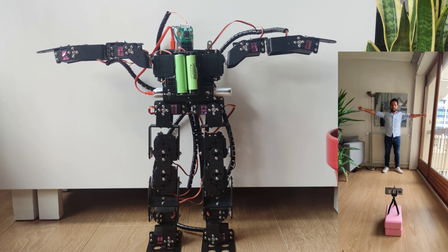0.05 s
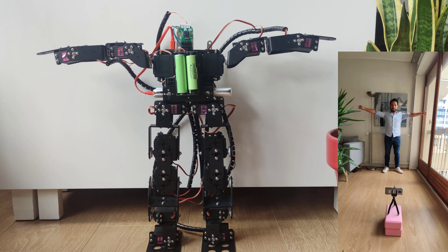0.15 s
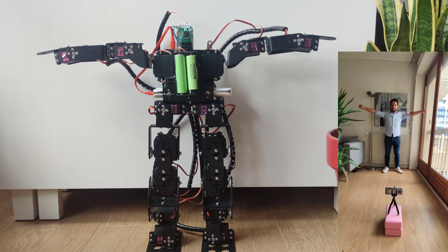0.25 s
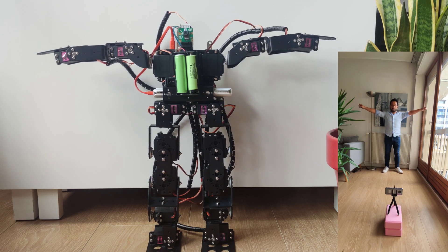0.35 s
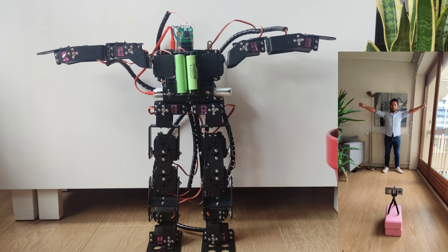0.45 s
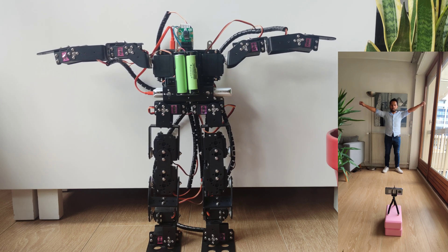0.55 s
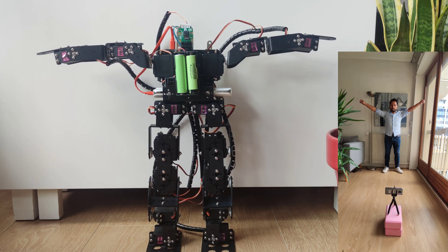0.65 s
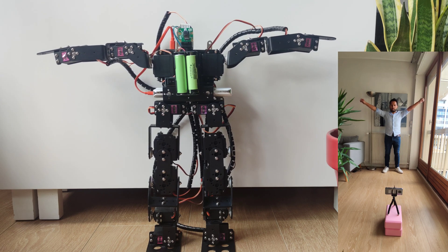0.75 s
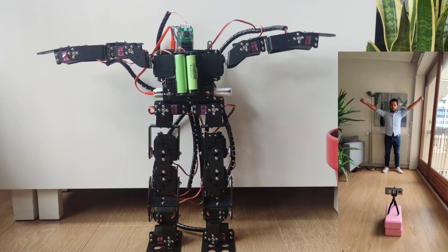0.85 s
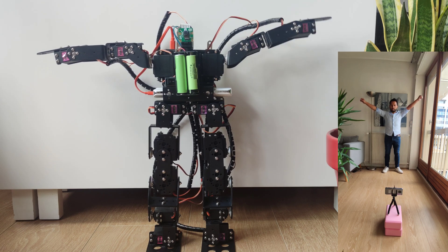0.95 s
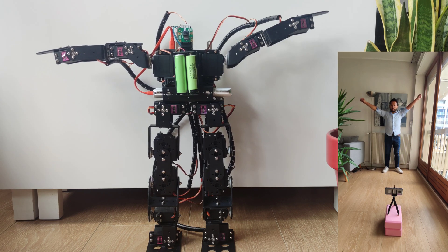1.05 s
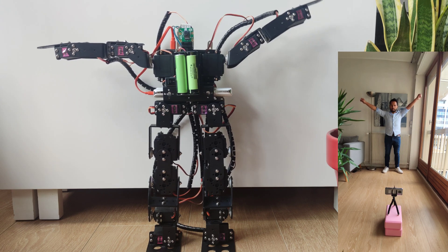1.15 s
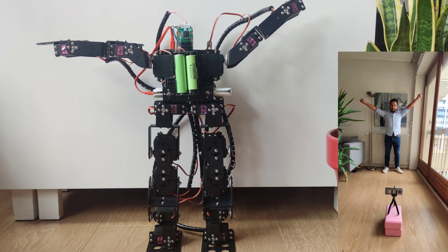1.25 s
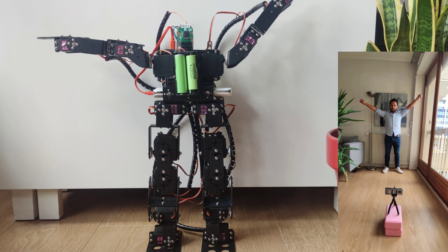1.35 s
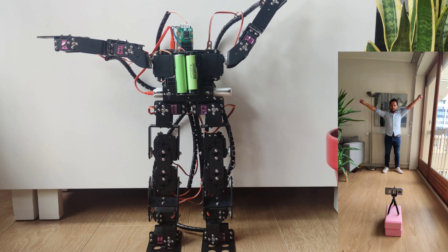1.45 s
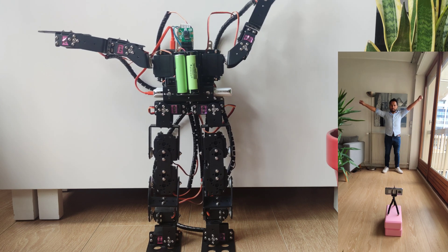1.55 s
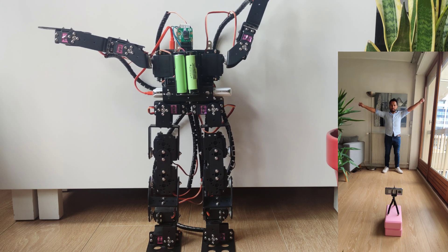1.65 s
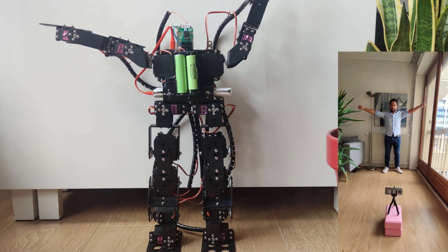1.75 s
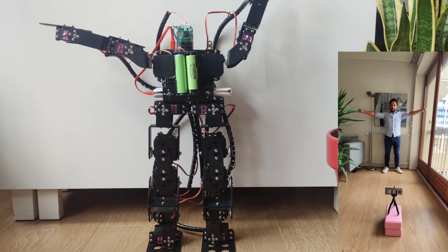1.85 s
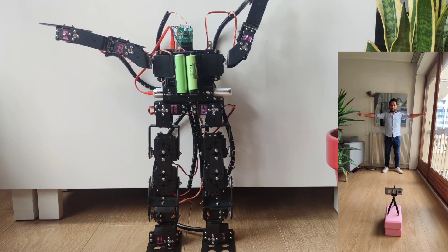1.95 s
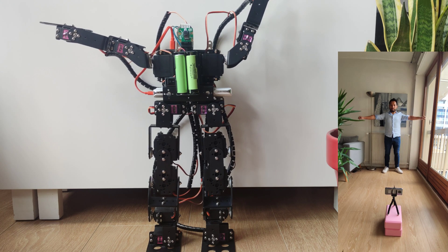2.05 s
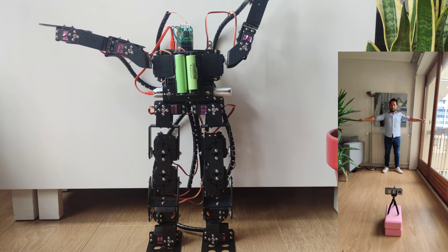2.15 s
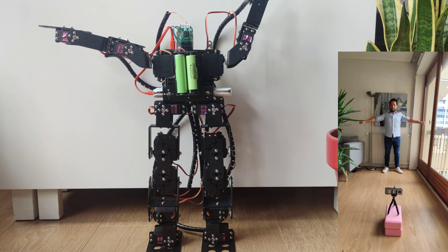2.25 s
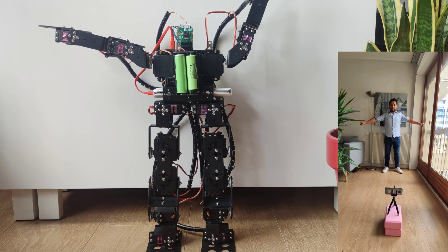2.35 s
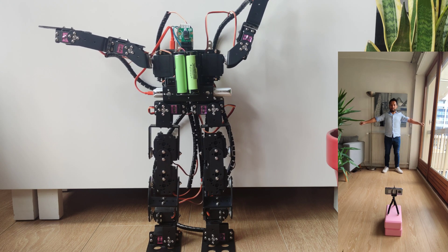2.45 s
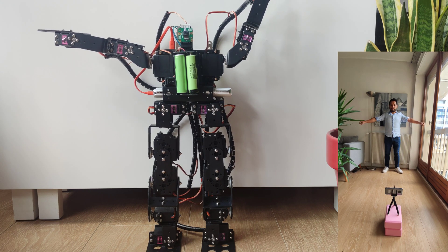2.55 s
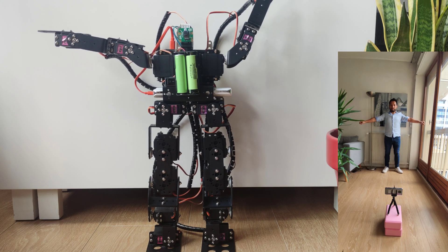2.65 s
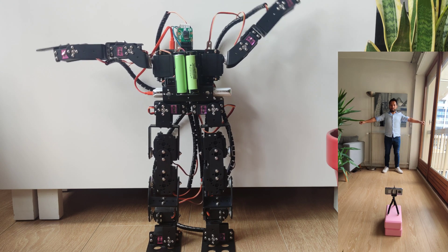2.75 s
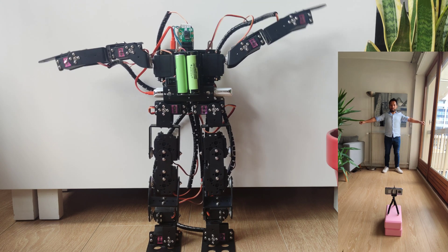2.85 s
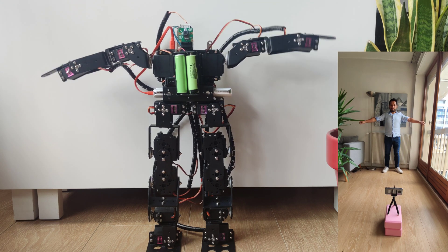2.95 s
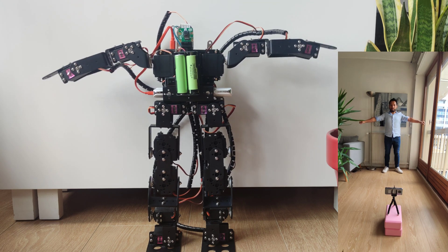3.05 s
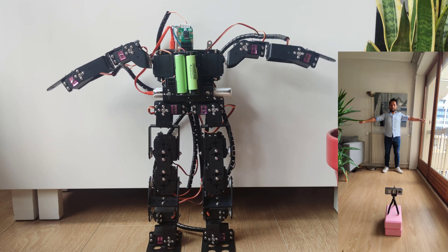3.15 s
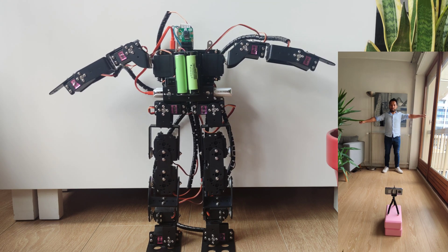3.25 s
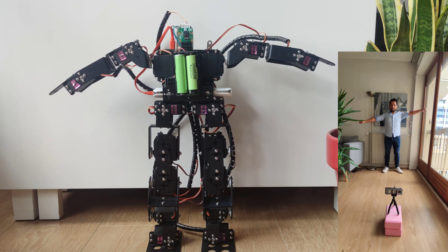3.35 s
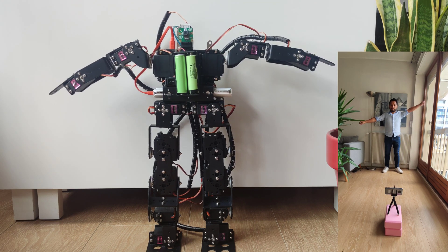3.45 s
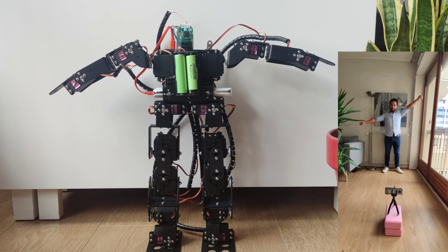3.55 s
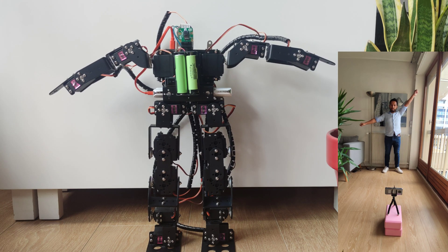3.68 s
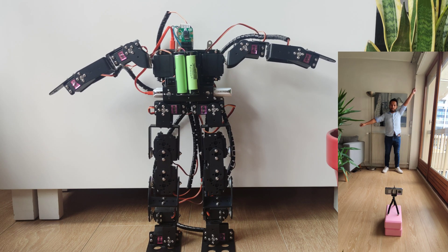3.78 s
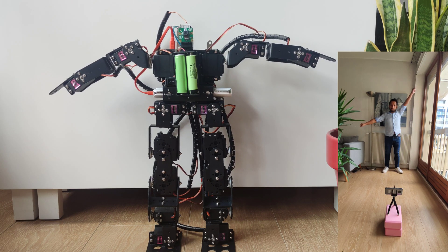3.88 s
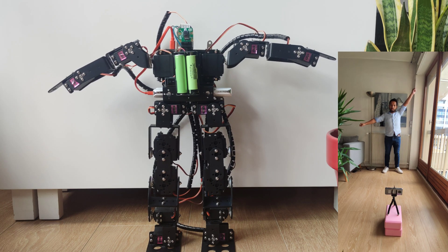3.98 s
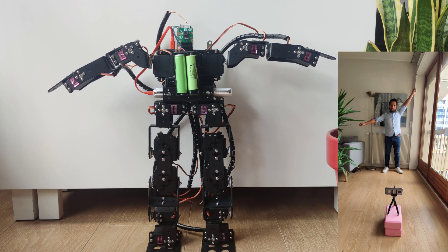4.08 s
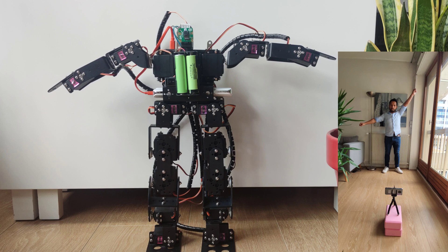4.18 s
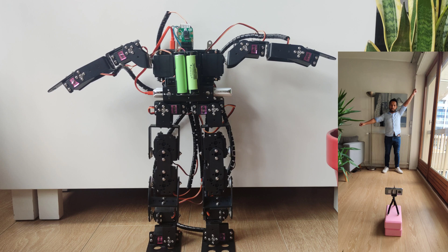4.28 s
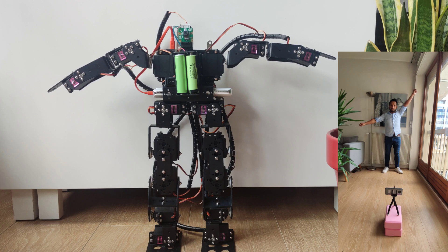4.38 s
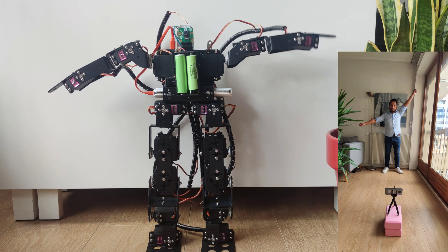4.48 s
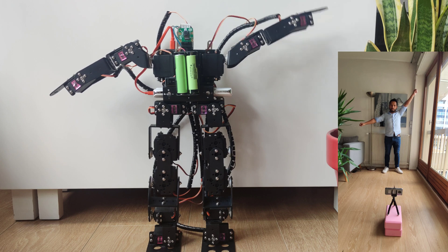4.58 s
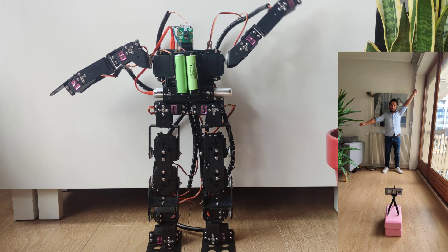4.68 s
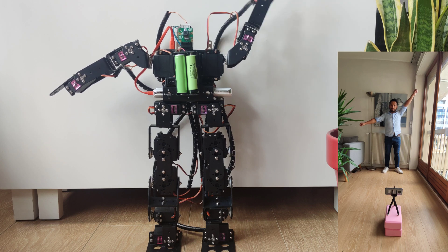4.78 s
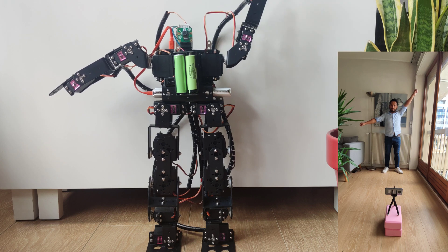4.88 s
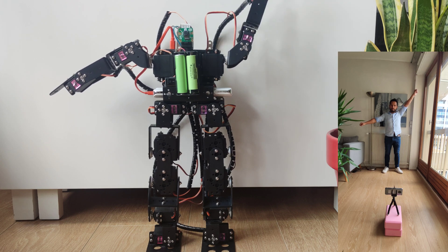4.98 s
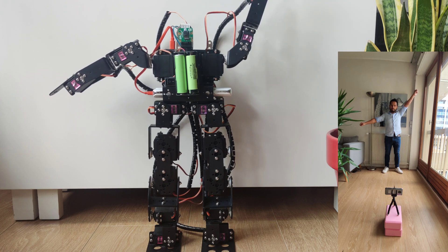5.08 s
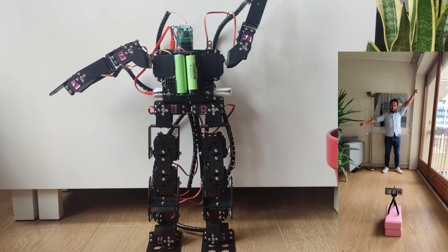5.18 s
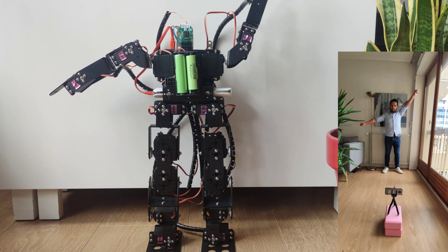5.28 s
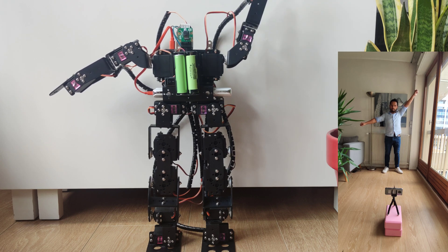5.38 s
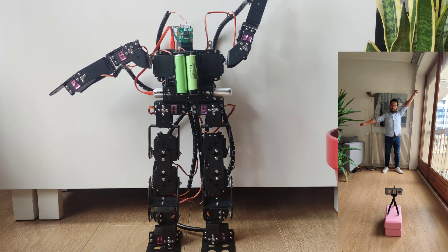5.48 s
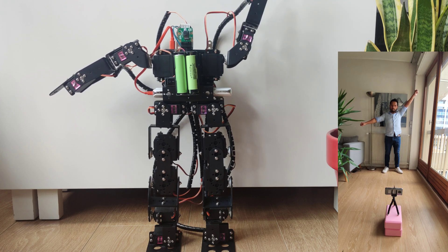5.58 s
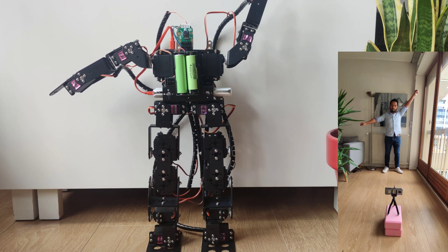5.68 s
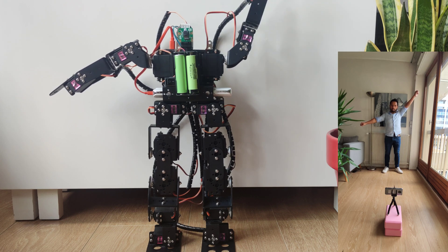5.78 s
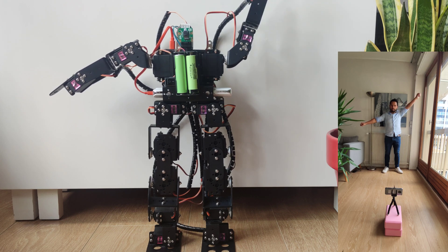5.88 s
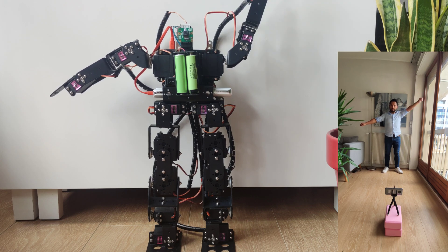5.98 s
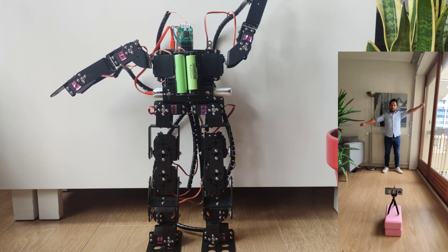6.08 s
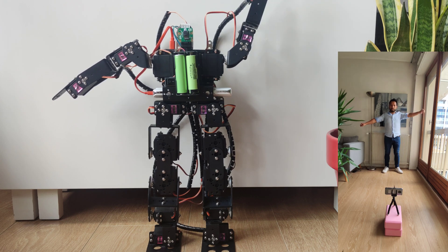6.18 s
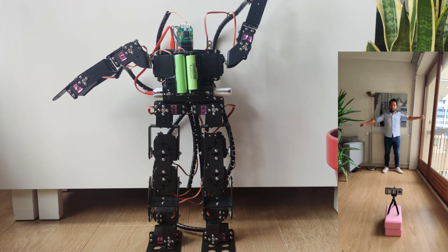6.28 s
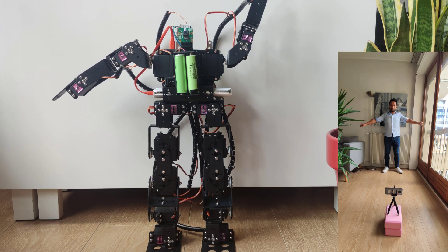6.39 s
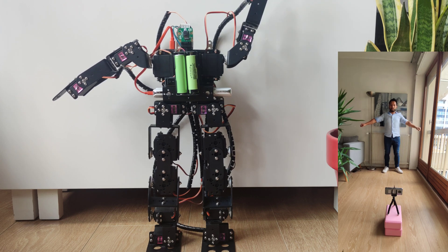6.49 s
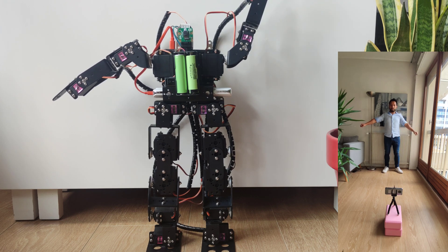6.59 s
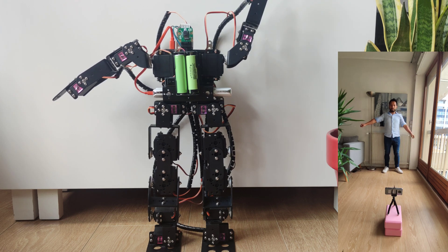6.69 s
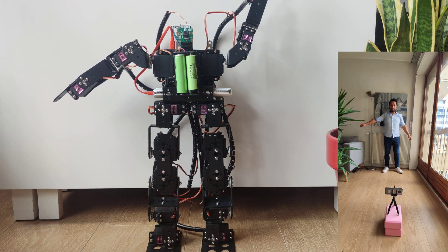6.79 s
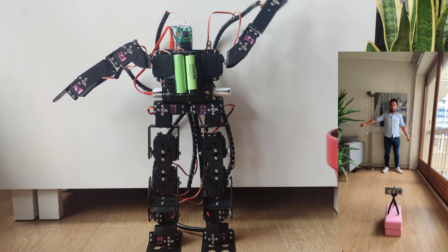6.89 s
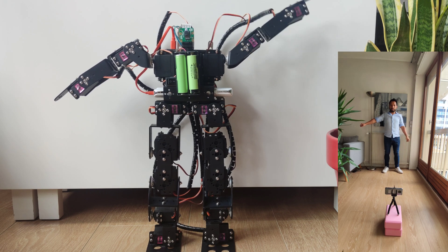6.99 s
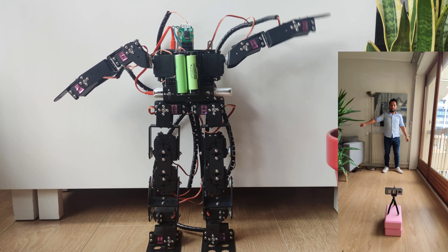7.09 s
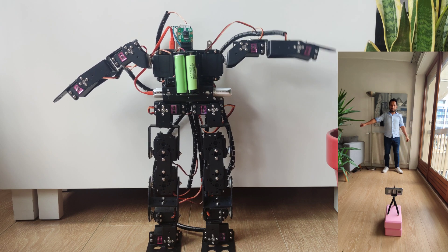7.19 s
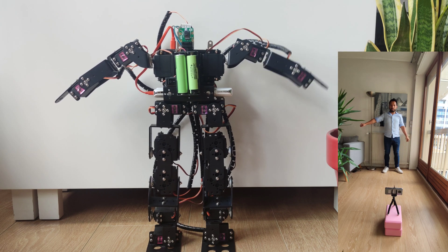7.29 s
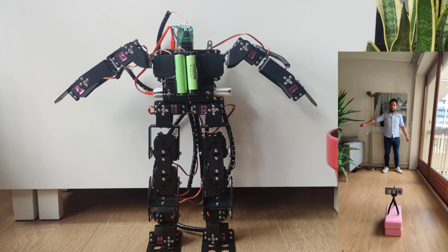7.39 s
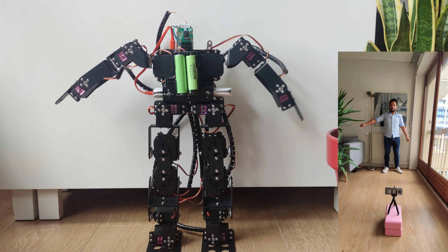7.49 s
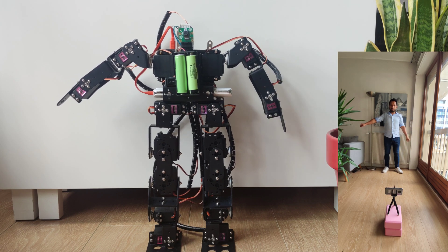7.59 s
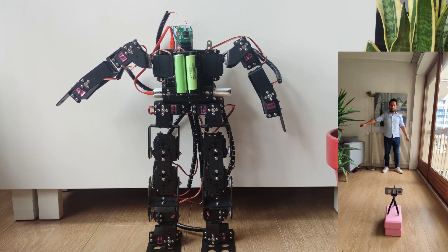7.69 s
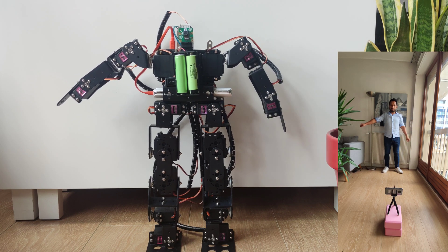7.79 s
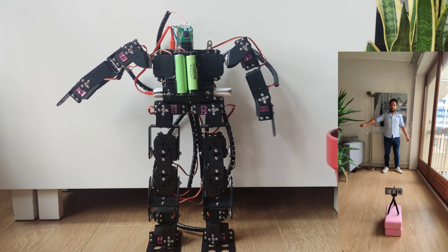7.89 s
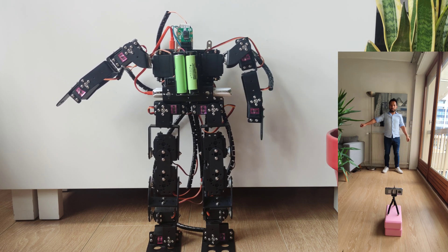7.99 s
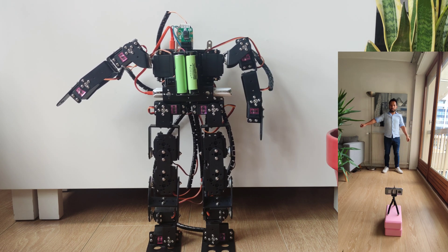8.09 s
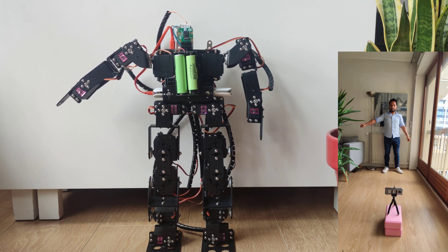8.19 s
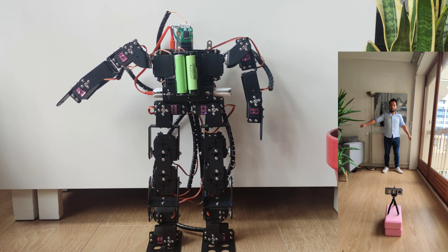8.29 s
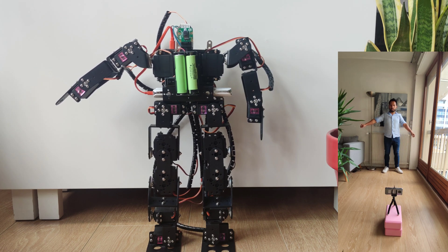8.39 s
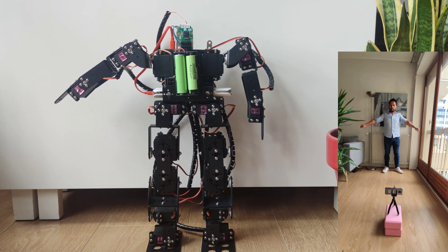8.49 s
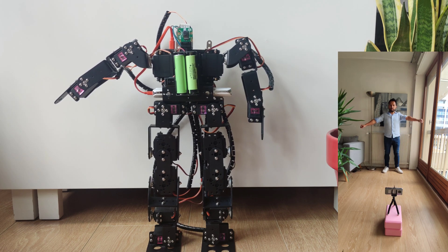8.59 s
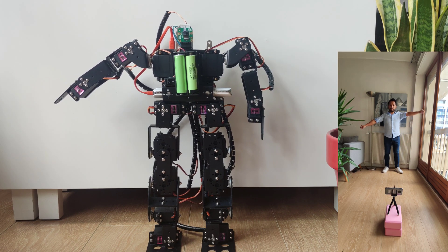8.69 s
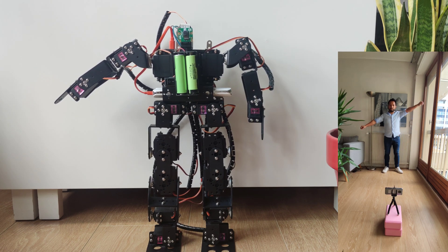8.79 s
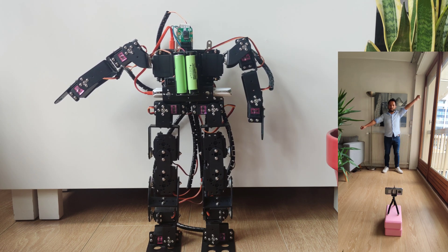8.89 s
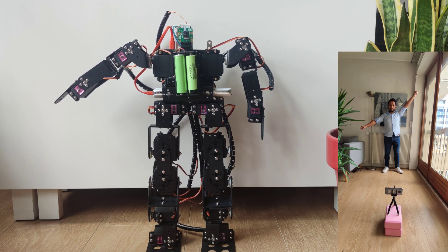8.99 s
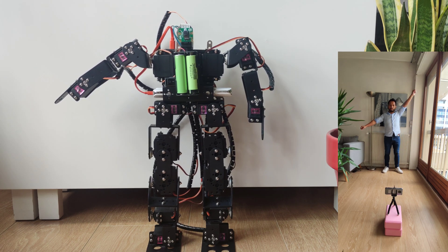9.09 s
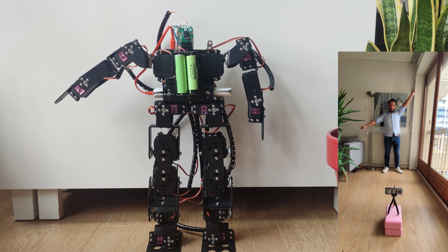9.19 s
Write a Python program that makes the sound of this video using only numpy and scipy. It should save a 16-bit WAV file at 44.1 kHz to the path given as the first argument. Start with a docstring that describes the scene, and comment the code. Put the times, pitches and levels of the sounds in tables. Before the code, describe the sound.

Close to the microphone, the little servo motors in a robot's arms run in four main bursts of high, gritty whirring, mixed with short chirps. The third burst sings with a whine that glides upward, and the fourth is broken by two faint, dull bumps before a final short whir. A thin electronic buzz, tiny gear twitches and soft indoor rumble fill the pauses.

```python
"""Close, rattling whirs of a small robot raising and lowering its arms in a quiet living room.
Servo gear teeth strike and slide in their cases; motor brushes hiss. Short pushes chirp, and on one
fast lift the teeth mesh evenly and sing a gliding whine. Joints knock twice, taking up slack.
Between moves the servos twitch, buzz under load and hum with their control pulses, over a low rumble."""
import sys
import numpy as np
from scipy import signal
from scipy.fft import rfft, irfft
from scipy.io import wavfile
from scipy.ndimage import map_coordinates

SR = 44100
rng = np.random.default_rng(int(sys.argv[2]) if len(sys.argv) > 2 else 0)


def int16_out(signal):
    """Quantize to a 16-bit WAV file."""
    q = np.round(np.clip(np.atleast_2d(signal).T, -1, 1) * 32767)
    wavfile.write(sys.argv[1], SR, q.astype(np.int16))


N = 407484
TIME = np.arange(N) / SR
FREQ = np.maximum(np.arange(N // 2 + 1) * SR / N, 1)
SIDE = np.array([[1], [-1]])  # left +, right -


def undb(db):
    """Decibels to gain."""
    return 10 ** (np.asarray(db) / 20)


def unit(x):
    """Scale to rms 1."""
    return x / np.sqrt(np.mean(x ** 2))


def noise():
    """White noise."""
    return rng.standard_normal(N)


def walk(rate_hz):
    """Smooth random control, spread near 1."""
    return 1.2 * np.interp(TIME * rate_hz, np.arange(N // 8), rng.standard_normal(N // 8))


def curve(points):
    """Control through (t/s, value) points."""
    return np.interp(TIME, *np.transpose(points))


def shape(points, grid_hz=FREQ):
    """Gain against frequency through (f/Hz, level/dB) points."""
    hz, db = np.transpose(points)
    return undb(np.interp(np.log(grid_hz), np.log(hz), db))


def colour(x, points):
    """Minimum-phase filter through (f/Hz, level/dB) points."""
    size = 2048
    grid_hz = np.maximum(np.arange(size // 2 + 1) * SR / size, 1)
    cepstrum = irfft(np.log(shape(points, grid_hz)))
    cepstrum[1:size // 2] *= 2
    cepstrum[size // 2 + 1:] = 0
    return signal.oaconvolve(x, irfft(np.exp(rfft(cepstrum))))[:N]


def ring(x, modes):
    """Parallel resonances (f/Hz, width/Hz, level/dB)."""
    return sum(undb(db) * signal.lfilter(*signal.iirpeak(hz, hz / width, SR), x)
               for hz, width, db in modes)


def pulses(hz):
    """One click a cycle, split between two samples."""
    cycles = np.cumsum(hz / SR)
    hit = np.diff(np.floor(cycles), prepend=0)
    late = cycles % 1 * SR / hz
    return hit * late + np.roll(hit * (1 - late), 1)


def drive(start_s, length_s, rise_s, fall_s):
    """Rises towards 1 while powered, then decays."""
    since_s = np.maximum(TIME - start_s, 0)
    return (1 - np.exp(-since_s / rise_s)) * np.exp(-np.maximum(since_s - length_s, 0) / fall_s)


def place(x, pan_db):
    """Pan by left minus right level."""
    return x * undb(SIDE * pan_db / 2)


def air(bed_db=-59, drone_db=-70.5):
    """Still room: low rumble, faint hiss, soft drones."""
    # mid spectrum: f/Hz, level/dB
    mid_colour = [(12, -18), (22, -2.5), (36, 0), (60, -4.5), (85, -7.5), (110, -5), (160, -11), (300, -14),
                  (480, -19.5), (750, -24.5), (1400, -27), (3900, -33), (7200, -33.5), (15800, -32.5)]
    # stereo width: f/Hz, side minus mid/dB
    side_colour = [(30, -1.5), (70, -10.5), (250, -4.5), (600, -0.5), (1500, 1.5), (6000, -0.5),
                   (9000, -15), (15000, -90)]
    # room drones: f/Hz, width/Hz, level/dB
    drones = [(230.3, 13.4, 0), (298, 19, -4.5), (438, 64, -8.5)]
    mid = irfft(rfft(noise()) * shape(mid_colour), N)
    side = irfft(rfft(noise()) * shape(mid_colour) * shape(side_colour), N)
    bed = (mid + SIDE * side) * undb(bed_db) / mid.std()
    return place(bed, pan_db=-0.5) + undb(drone_db) * unit(ring(noise(), drones))


def hum(frame_hz=49.27):
    """Control frames repeat steadily; their harmonics sound where the motors resonate."""
    # motor resonances: f/Hz, width/Hz, level/dB
    modes = [(1930, 56, -80.3), (2938, 134, -78.3)]
    # drift of the lower resonance: t/s, gain/dB
    lower_drift = [(0, -0.5), (2, 2), (4, 2.5), (5.5, 0), (8.3, -1), (9.24, -4)]
    phase = 2 * np.pi * np.cumsum(frame_hz * (1 + 0.00043 * walk(3))) / SR
    out = 0
    for (hz, width_hz, db), drift_db in zip(modes, [curve(lower_drift), 0]):
        orders = round(hz / frame_hz) + np.arange(-3, 4)
        weights = 1 / (1 + (2 * (orders * frame_hz - hz) / width_hz) ** 2)
        tone = sum(w * np.cos(k * phase + rng.uniform(0, 2 * np.pi)) for k, w in zip(orders, weights))
        out += undb(db + drift_db + 1.5 * walk(25)) * unit(tone)
    return out


def holding(hunt_hz=128, wander=0.03):
    """A servo bearing the arm's weight hunts around its position and buzzes thinly."""
    # case resonances: f/Hz, width/Hz, level/dB
    modes = [(5220, 62, -12), (7050, 120, 2), (7543, 37, 12.5), (8430, 210, -1), (10100, 65, -5)]
    # spells under load: start/s, length/s, level/dB
    holds = [(-0.5, 2.92, -73), (3, 1.1, -70), (5, 4.15, -72)]
    kick_hz = hunt_hz * (1 + wander * np.tanh(walk(2.5)))
    kicks = unit(pulses(kick_hz) * undb(5.1 * np.tanh(walk(60)))) + noise()
    buzz = colour(ring(kicks, modes), [(2000, -41), (4700, 16.5), (10000, -7.5), (13000, -18)])
    effort = sum(undb(db) * drive(start_s, length_s, rise_s=0.096, fall_s=0.21)
                 for start_s, length_s, db in holds)
    return effort * unit(buzz)


def twitches():
    """The motor nudges the gears by a few teeth."""
    # nudges: t/s, level/dB, half length/s
    nudges = [(0.194, -68.5, 0.051), (2.242, -65.5, 0.051), (2.589, -61, 0.062), (2.71, -58.5, 0.017),
              (3.8, -70, 0.055), (4.05, -69.5, 0.053), (4.503, -52, 0.019), (6.237, -65.5, 0.059),
              (8.52, -64.5, 0.047)]
    # twitch spectrum: f/Hz, level/dB
    twitch_colour = [(2500, -17), (4000, -9.5), (6000, -6.5), (7500, -2.5), (9000, -6.5), (10500, 1),
                     (11800, -16), (15500, -20)]
    swell = sum(undb(db) * np.exp(-((TIME - at_s) / half_s) ** 2) for at_s, db, half_s in nudges)
    grit = noise() * undb(2.4 * walk(370))
    return swell * unit(colour(grit, twitch_colour))


def motor(load, spin_up_s=0.045, coast_s=0.08):
    """Each push spins a motor up, then it coasts; gives speed (0-1), gear gain and brush gain."""
    # power pushes: start/s, length/s, gear level/dB, brush level/dB, load
    pushes = [(0.88, .08, -44.5, -58, "slow lift"), (0.946, .05, -36, -51, "slow lift"),
              (1.09, 0.16, -48.5, -59, "slow lift"), (1.262, .17, -46.5, -59, "slow lift"),
              (1.499, .148, -48, -58, "slow lift"), (2.701, 0.16, -38, -47.5, "drop"),
              (2.841, 0.058, -32, -41, "drop"), (2.913, 0.11, -34.5, -44, "drop"),
              (3.094, .125, -42, -59, "drop"), (4.451, .09, -39, -53, "fast lift"),
              (4.496, 0.38, -39.5, -50.5, "fast lift"), (6.882, 0.17, -43, -46, "drop"),
              (7.046, .03, -34, -49, "drop"), (7.088, 0.37, -39.5, -44.5, "drop"),
              (7.493, .06, -43, -62, "drop"), (7.542, 0.072, -33, -44, "drop"),
              (7.621, .07, -46, -59, "drop"), (7.915, .06, -47, -57, "settle"),
              (7.961, .074, -42.5, -53, "settle")]
    speed, gear_power, brush_power = np.zeros((3, N))
    for start_s, length_s, gear_db, brush_db, kind in pushes:
        if kind == load:
            spin = drive(start_s, length_s, spin_up_s, coast_s)
            speed = np.maximum(speed, spin)
            gear_power += (undb(gear_db) * spin ** 2) ** 2
            brush_power += (undb(brush_db) * spin ** 2) ** 2
    return speed, np.sqrt(gear_power), np.sqrt(brush_power)


def roam(x, patchy_db=4, apart_db=2, span_hz=420, change_s=0.022):
    """Turning wheels feed ever different resonances, each aimed its own way; mono to stereo."""
    hz, t, bands = signal.stft(x, SR, nperseg=256)
    grid = np.meshgrid(hz / span_hz, t / change_s, indexing="ij")
    both, apart = (map_coordinates(field, grid, order=1, mode="wrap")
                   for field in rng.standard_normal((2, 128, 1024)))
    gain = undb(apart_db * np.array([apart, -apart]) + patchy_db * np.clip(both, -2, 2))
    return signal.istft(bands * unit(gain), SR, nperseg=256)[1][:, :N]


def gears(load, case, tooth_hz, growl_db, ring_db, scatter_db, lurch_db, pan_db, elbow_db=-12):
    """Teeth strike unevenly and slide; a faster motor rattles louder and denser."""
    # treble loss of the cases: f/Hz, gain/dB
    case_top = [(11800, 0), (13000, -10)]
    # case resonances: f/Hz, width/Hz, level/dB
    case_modes = [(5390, 110, -6), (7335, 90, 0), (7790, 70, 1), (8700, 130, -1), (9800, 120, -2),
                  (10470, 110, 0)]
    # low ring of the arm brackets: f/Hz, level/dB
    bracket = [(400, -33.5), (900, -17), (1400, -6), (1950, 1), (2700, 6.5), (3150, 12), (4000, -8),
               (5000, -28.5)]
    # motor brush hiss: f/Hz, level/dB
    brush_colour = [(9000, -30), (11500, -11), (12400, -7), (13400, -5), (14500, -1), (15800, -10.5)]
    speed, gear_gain, brush_gain = motor(load)
    chatter_hz = tooth_hz * np.maximum(speed, 0.35)  # loose teeth chatter no slower
    strikes = pulses(chatter_hz * (1 + 0.3 * np.tanh(walk(2500))))
    strikes = unit(strikes * undb(scatter_db * np.clip(noise(), -2, 2)))
    rattle = unit((strikes + noise()) * undb(lurch_db * walk(260)))  # backlash: the load lurches
    body = unit(colour(colour(rattle, case), case_top))
    ringing = undb(ring_db) * unit(ring(rattle, case_modes))
    growl = undb(growl_db) * (gear_gain / gear_gain.max()) ** 0.65 * unit(colour(rattle, bracket))
    brushes = brush_gain * unit(colour(noise(), brush_colour))
    elbow = undb(elbow_db) * unit(colour(noise(), case)) * SIDE  # second joint slides along
    servo = roam(gear_gain * unit(body + ringing) + growl + brushes)
    return place(servo + gear_gain * elbow, pan_db)


def chirps(sag=0.2, flutter=0.0116, between_db=-7, tilt_per_db=0.17, tilt_above_db=-47):
    """A short push meshes the teeth evenly for a moment; the pitch arches up and down."""
    # motor spurts: t/s, half length/s, top tooth rate/Hz, level/dB
    spurts = [(0.997, 0.034, 1066, -53), (1.213, 0.02, 1165, -44.5), (1.39, 0.068, 1009, -50),
              (1.611, 0.054, 1140, -52.5), (2.771, 0.041, 1095, -42), (2.893, .025, 1088, -51),
              (3.013, 0.024, 1093, -65), (6.953, .028, 1126, -39), (7.568, .025, 1052, -49),
              (7.973, 0.023, 1040, -45.5)]
    # chirp filter: f/Hz, gain/dB
    chirp_colour = [(1000, -32), (2000, -9), (3200, -7), (3800, -18), (4400, -11), (5300, -5), (6300, -5),
                    (7500, 1.5), (8800, -14), (10500, -15), (12000, -20), (15800, -14)]
    out = np.zeros(N)
    wobble = 1 + flutter * walk(250)
    for at_s, half_s, top_hz, db in spurts:
        near = np.abs(TIME - at_s) < 2 * half_s
        u = (TIME[near] - at_s) / half_s
        phase = 2 * np.pi * np.cumsum(top_hz * wobble[near] * np.exp(-sag * u ** 2)) / SR
        tilt = tilt_per_db * max(db - tilt_above_db, 0)  # harder is brighter
        tone = 0
        for k in range(2, 25):
            # strong and weak teeth alternate: softer lines between the harmonics
            weight = undb(between_db * (k % 2)) * (k / 10) ** tilt
            tone += weight * np.cos(k * phase / 2 + rng.uniform(0, 2 * np.pi))
        out[near] += undb(db) * np.exp(-u ** 2) * tone / 2
    return roam(colour(out, chirp_colour), patchy_db=5)


def whine(flutter=0.00402, shimmer_db=3, mesh_db=-44, shaft_db=-65):
    """At full speed the teeth mesh evenly and sing; gear runout flutters the tone."""
    # fast lift: t/s, tooth rate/Hz
    glide = [(4.5, 1082), (4.508, 1125), (4.538, 1404), (4.554, 1527), (4.586, 1648), (4.636, 1634),
             (4.702, 1754), (4.762, 1733), (4.824, 1822), (4.85, 1620), (4.88, 1190), (4.89, 1080)]
    # case response: f/Hz, gain/dB
    case = [(1700, -25), (2900, -12), (3400, -8.5), (4200, -15.5), (5200, 1.5), (7000, -1.5), (8700, 2),
            (9300, -8), (10500, -5)]
    # lightly damped parts rung by passing harmonics: f/Hz, width/Hz, level/dB
    modes = [(5390, 26, 0), (6950, 44, 15)]
    tooth_hz = curve(glide)
    speed = tooth_hz / tooth_hz.max()
    wobble = 1 + flutter / speed ** 5 * walk(300)  # a slower mesh is looser, rougher
    phase = 2 * np.pi * np.cumsum(tooth_hz * wobble) / SR
    mesh = sum(undb(shimmer_db * walk(220)) * np.sin(k * phase) for k in range(1, 7))
    # teeth sing while the power presses them together
    grip = drive(start_s=4.485, length_s=0.343, rise_s=0.017, fall_s=0.052)
    tone = colour(mesh * speed ** 2 * grip, case)
    tone += ring(tone, modes)
    running = np.clip(np.minimum(TIME - glide[0][0], glide[-1][0] - TIME) / 0.01, 0, 1)
    shaft = undb(shaft_db) * np.sin(phase / 21) * running  # a slower wheel shakes the frame
    return np.sqrt(2) * (undb(mesh_db) * tone + shaft)


def knocks(decay_s=0.017):
    """A joint takes up its slack and bumps the frame dully."""
    # bumps: t/s, level/dB
    bumps = [(7.191, -55), (7.422, -53)]
    envelope = sum(undb(db) * (TIME > at_s) * np.exp(-np.abs(TIME - at_s) / decay_s)
                   for at_s, db in bumps)
    return envelope * unit(colour(noise(), [(100, -14), (250, -3), (520, 0), (800, -9), (2000, -24)]))


def room(x, t60_s=0.45, wet_db=-10, early_t60_s=0.018, early_db=-7):
    """Cabinet and floor reflect at once; the room adds a short tail."""
    # reflections: f/Hz, gain/dB
    walls = [(1000, -3), (4000, 5), (6500, 3.5), (8000, -4.5), (8800, -4), (10800, -21), (15000, -1)]
    t = TIME[:SR // 2]

    def tail(length_s):
        response = rng.standard_normal((2, len(t))) * undb(-60 * t / length_s) * (t > 0.001)
        return response / np.sqrt(np.sum(response ** 2, axis=1, keepdims=True))
    late = undb(wet_db) * tail(t60_s)
    early = undb(early_db) * tail(early_t60_s)[0] * SIDE  # from the sides, in opposite phase
    reflected = colour(x.mean(axis=0), walls)
    return x + signal.oaconvolve(reflected[None], late + early, axes=1)[:, :N]


def beam(x):
    """The cases radiate some bands to one side."""
    # directivity: f/Hz, left minus right/dB
    balance = [(2000, 0.5), (4300, -1.5), (5050, 1.5), (5650, -0.5), (6500, 0), (7100, -8.5), (8050, -5),
               (8450, -6.5), (9400, -2), (10900, -1), (11800, -6), (13500, 4.5), (15000, -11)]
    return irfft(rfft(x) * shape(balance) ** (SIDE / 2), N)


def scene():
    """Gear trains under four loads, the other robot sounds and the room."""
    # gear train spectrum under each load: f/Hz, level/dB
    slow_colour = [(1760, -51), (3000, -11), (3350, -27), (3770, -27), (4580, -14.5), (5200, -2),
                   (5650, -5), (6580, -2), (7150, 1), (8160, -5.5), (9650, -6.5), (10900, 0), (12000, -24),
                   (14000, -20), (15800, -22)]
    fast_colour = [(1500, -47), (3000, -31), (4000, -17), (5000, 2), (5900, 2.5), (7300, 11), (8100, 0),
                   (8800, 7.5), (9600, -0.5), (10600, 9.5), (11300, 4), (12000, -18), (13800, -12),
                   (15800, -20)]
    drop_colour = [(1760, -44), (3000, -9.5), (3850, -19), (4340, -6), (4780, -11.5), (5490, -1),
                   (6540, -5.5), (7050, -0.5), (7510, 4.5), (8160, -0.5), (10600, -3), (12300, -14),
                   (13700, -5), (14800, -13), (15800, 5)]
    settle_colour = [(1410, -42), (2400, -33), (3110, -4.5), (3790, -19), (5000, -6.5), (6430, -8.5),
                     (7410, -4), (8820, -4), (9540, -4), (10100, -9), (12600, -15), (15100, -17),
                     (15800, -18)]
    robot = gears("slow lift", slow_colour, tooth_hz=1047, growl_db=-62.5, ring_db=-17,
                  scatter_db=0.5, lurch_db=1.5, pan_db=3)
    robot += gears("fast lift", fast_colour, tooth_hz=1757, growl_db=-68.5, ring_db=-26,
                   scatter_db=4, lurch_db=0.5, pan_db=3)
    robot += gears("drop", drop_colour, tooth_hz=1157, growl_db=-55.5, ring_db=-8,
                   scatter_db=3.5, lurch_db=1.3, pan_db=1.5)
    robot += gears("settle", settle_colour, tooth_hz=1031, growl_db=-65, ring_db=-22,
                   scatter_db=4, lurch_db=1, pan_db=2)
    robot += whine() + chirps() + twitches() + knocks() + hum() + holding()
    return beam(room(robot)) + air()


def record(dry):
    """Steep low-pass."""
    top_hz = 15700
    return signal.sosfilt(signal.ellip(12, 0.1, 70, top_hz, fs=SR, output="sos"), dry)


dry = scene()
out = record(dry)
int16_out(out)
```